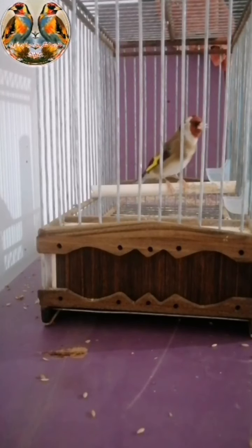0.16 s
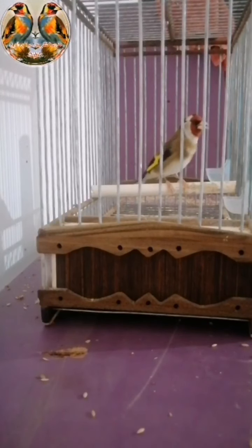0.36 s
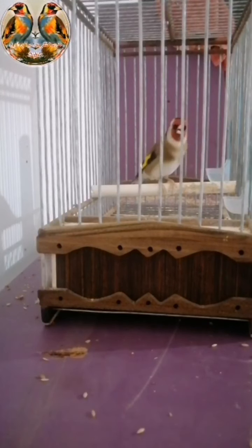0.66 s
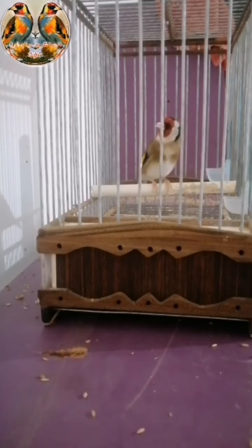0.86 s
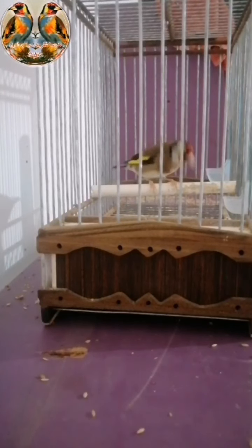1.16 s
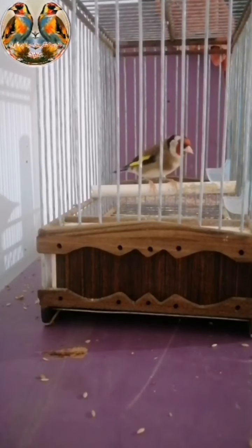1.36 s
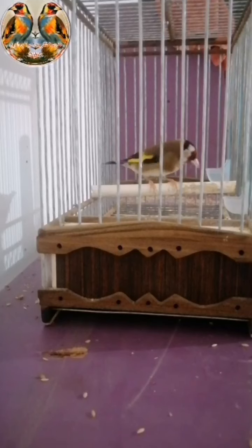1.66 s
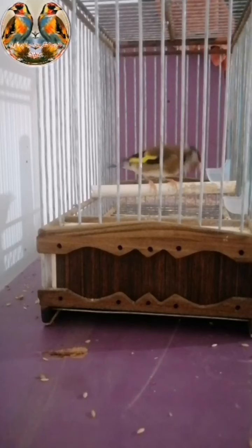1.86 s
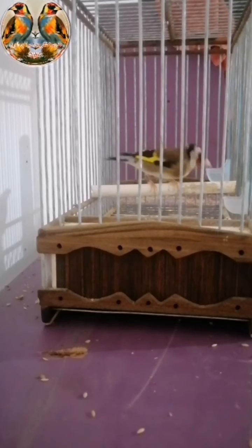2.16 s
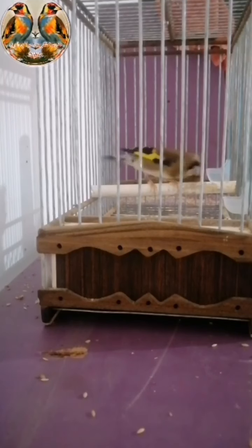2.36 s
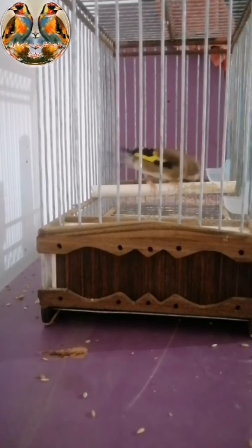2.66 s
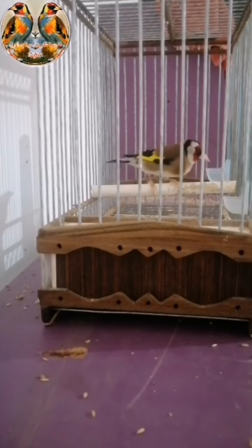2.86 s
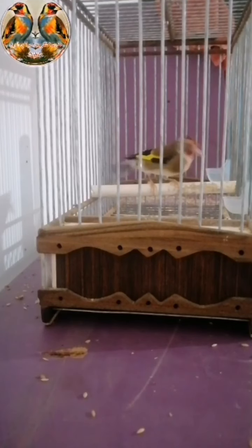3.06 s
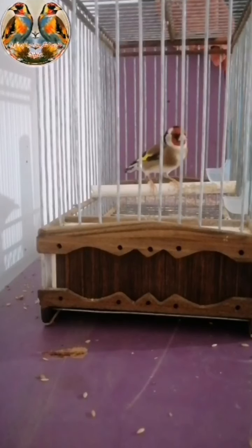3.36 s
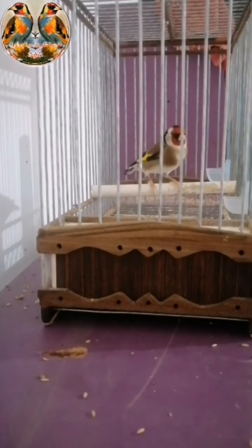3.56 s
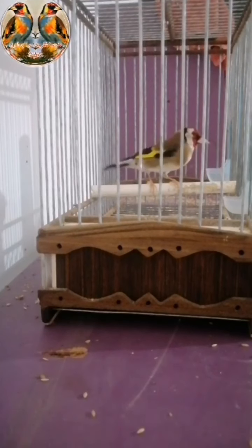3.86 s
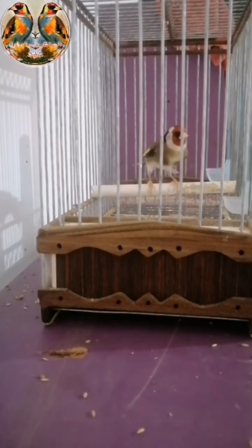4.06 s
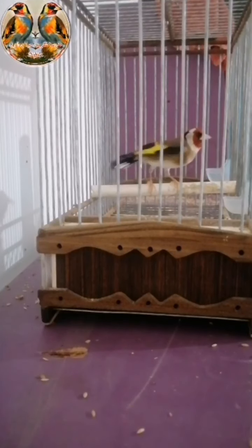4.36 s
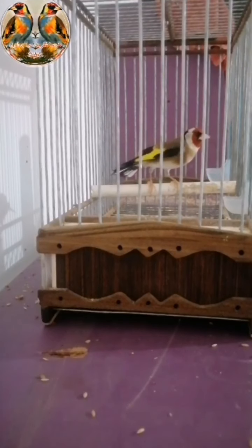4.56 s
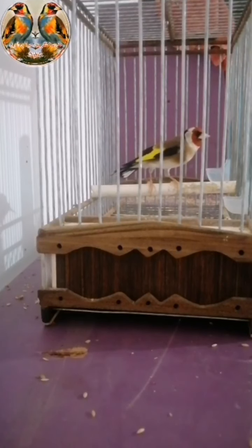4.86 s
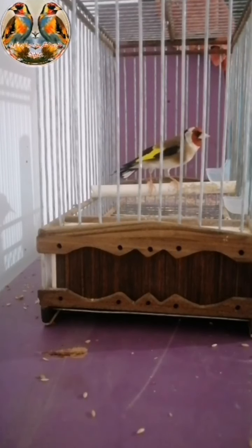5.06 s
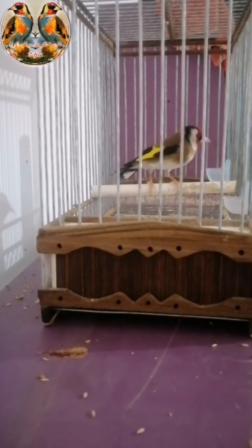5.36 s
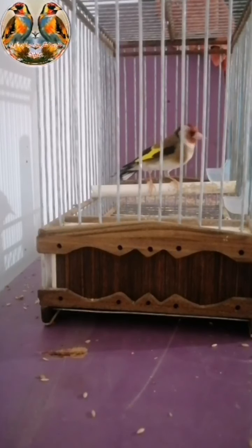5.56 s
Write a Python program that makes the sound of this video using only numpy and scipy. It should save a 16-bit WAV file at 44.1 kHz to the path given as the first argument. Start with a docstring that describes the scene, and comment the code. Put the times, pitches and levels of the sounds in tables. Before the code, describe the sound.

Rapid finch twittering, soft perch knocks and claw scrapes, then a few chirps indoors, with faint distant birds and low rumble.

```python
"""A caged finch is already in a fast phrase, close to the right-hand port of a phone in a small bare room,
over a bed of outside rumble, mains hum and microphone hiss. After a second it stops; the rumble swells
and other small birds whistle farther off. From 2 to 3 s it hops and knocks on its perch, and its claws
set the bars ringing. After 4 s come a few chirps, a long nasal note and a closing fall; the far birds
have the last word."""
import sys
import numpy as np
from scipy import signal
from scipy.fft import rfft, irfft
from scipy.io import wavfile

SR = 44100
rng = np.random.default_rng(int(sys.argv[2]) if len(sys.argv) > 2 else 0)


def digitize_waveform(pressure):
    """Quantize a signal to 16-bit integers and store it at the path in sys.argv[1].

    Rows of a 2-D input are taken as channels; values are limited to [-1, 1].
    """
    field = np.atleast_2d(pressure).T
    bounded = np.clip(field, -1, 1)
    quanta = np.round(bounded * 32767).astype(np.int16)
    wavfile.write(sys.argv[1], SR, quanta)


N = 252252

# ride of the outside rumble: t/s, level/dB
RUMBLE_RIDE = [(0, -64), (1.0, -64), (1.3, -53), (1.65, -56), (2.0, -59.5), (4.1, -60), (4.5, -60),
               (4.85, -62.5), (5.1, -57.5), (5.72, -61)]
# its tone: f/Hz, relative density/dB
RUMBLE_EQ = [(70, -25.5), (130, -2.5), (190, -0.5), (300, -2), (500, -2), (800, -7), (1350, -15),
             (2400, -13.5), (4000, -34), (6000, -70)]
# ride of the deep rumble in the building, which the hum follows: t/s, level/dB
DEEP_RIDE = [(0, -67.5), (1.0, -70.5), (1.2, -57.5), (2.0, -63), (4.0, -64), (4.8, -69), (5.1, -62),
             (5.72, -59.5)]
# its tone: f/Hz, relative density/dB
DEEP_EQ = [(18, -14.5), (45, -0.5), (75, -0.5), (130, -14), (200, -68)]
# stereo image of both rumbles: f/Hz, left-right correlation/0-1
RUMBLE_CORRELATION = [(60, 0.51), (290, 0.83), (640, 0.47), (1400, 0.019)]
# their lean to the right: f/Hz, left minus right/dB
RUMBLE_PAN = [(60, -1), (200, -2.5), (700, -9), (2400, -9.5)]
# tone of the microphone hiss: f/Hz, relative density/dB
HISS_EQ = [(2000, -77), (3500, 5.5), (5000, 8.5), (8000, 3.5), (15600, 5)]

# slaps off near surfaces: delay at the right port/s, level/dB
REFLECTIONS = [(.0021, -17), (.0047, -13.5), (.0083, -10), (0.0137, -25), (0.02, -14)]
# the room's initial decay: f/Hz, t60/s
ROOM_DECAY = [(200, 0.82), (2500, 0.91), (6600, 0.73), (12000, 0.35)]
# colour of the microphone ports: f/Hz, gain/dB
PORT_EQ = [(6500, -1.5), (7300, -2.5), (8700, -5.5), (10200, -13), (12000, 3.5), (14000, -13)]
# the phone's body shades the left port: f/Hz, gain/dB
LEFT_SHADE_EQ = [(2500, -4), (6000, 0), (8000, -10), (13000, -14)]

# cues for the far birds: t/s, length/s, start f/Hz, end f/Hz, level/dB
FAR_WHISTLES = [(1.271, 0.23, 3876, 3799, -56), (1.401, 0.19, 2522, 2561, -60.5),
                (3.301, 0.11, 2118, 2104, -71), (3.462, 0.14, 2403, 2240, -64),
                (4.375, 0.051, 3850, 3900, -45.5), (4.62, 0.111, 1712, 1900, -55.5),
                (5.031, 0.028, 4150, 4560, -67), (5.077, 0.15, 2396, 2460, -68),
                (5.12, 0.039, 3150, 3910, -56), (5.324, 0.1, 6030, 5950, -74),
                (5.384, 0.0516, 2830, 3285, -52), (5.429, 0.017, 3530, 4430, -54.5),
                (5.558, 0.029, 2644, 3180, -50.5), (5.585, 0.044, 3640, 4180, -64.5),
                (5.637, 0.077, 6690, 6550, -62.5)]
# feet and beak on perch and cage: t/s, relative thud level/dB, relative tick level/dB
KNOCK_CUES = [(2.075, -36.5, -55.5), (2.191, -45.5, -66), (2.234, -44, -53.5), (2.529, -33, -48),
              (2.601, -44.5, -65), (2.833, -47, -56.5)]
# a claw drags along a bar: t/s, length/s, ring f/Hz, ring gain/dB
SCRAPE_CUES = [(2.098, .05, 1410, -53), (2.17, .04, 1480, -46), (2.28, 0.038, 1580, -54),
               (2.585, 0.048, 1460, -56.5), (2.86, .07, 1170, -52)]
# resonances of the cage floor: f/Hz, gain/dB, t60/s
FLOOR_MODES = [(208.5, -9, 0.15), (280, 3.5, 0.14), (321.3, -2.5, 0.24), (439, -10.5, 0.21)]
# resonances of the bars: f/Hz, gain/dB, t60/s
BAR_MODES = [(1195, -10.5, 0.016), (1360, 11, 0.016), (1607, 10, 0.023), (2130, 16, 0.0065),
             (2620, 0, 0.014), (7630, 1.5, 0.005), (11900, -3, 0.002)]

# the notes of each syllable, one glide under one swell apiece: delay/s, length/s, start f/Hz, end f/Hz,
# haste, peak position/0-1, level/dB, swell/dB, fade/dB, second harmonic/dB, third harmonic/dB
SYLLABLES = { "hooked rise": [(-.004, 0.022, 2830, 3070, -0.8, 0.93, -5, 14, 13, -28.5, -31),
             (.016, 0.0067, 3228, 3160, 0.17, 0.6, 2.5, 10, 10, -28.5, -32),
             (.023, 0.012, 3260, 3970, -0.83, .8, -10.5, 2, 3, -25.5, -33),
             (.035, 0.024, 4025, 4406, 1.55, .4, -4, 6.5, 15.5, -23.5, -31.5)],
             "whip": [(-.005, .01, 3170, 4250, -.6, .9, -18, 5.5, 1.5, -29.5, -41),
             (.003, 0.023, 4157, 6750, 2.0, 0.32, 1, 13.5, 37.5, -21, -39)],
             "fall": [(-.002, .027, 7000, 6480, 3, 0.5, 0.5, 20, 9.5, -16.5, -52.5)],
             "double flick": [(0, .023, 3812, 5640, .3, 0.45, 0.5, 19, 14.5, -21.5, -53),
             (.024, .015, 4585, 5412, 0.27, .45, -4, 16, 10, -22.5, -40.5)],
             "dip": [(0, .013, 3723, 2964, .4, 0.7, -4, 13, 14, -31.5, -35),
             (.013, 0.014, 2917, 3612, 1.8, 0.03, 2, 9.5, 5.5, -31, -29),
             (.026, 0.014, 3534, 3646, .1, .35, 0, 8, 23, -31, -27.5)],
             "chirp": [(0, 0.013, 4570, 5690, 3, 0.77, 3.5, 16.5, 15.5, -17, -49),
             (0.0015, 0.029, 3170, 4090, -1.5, 0.54, 6.5, 29, 5.5, -33, -24),
             (.005, 0.021, 2350, 2700, -5, 0.16, -8, -5, 0, -12, -28),
             (.003, .012, 8300, 9000, 1.5, .6, -11, 8, 8, -40, -60),
             (0.038, 0.016, 4820, 5060, -5, 0.5, 1, 12, 11, -17, -38)],
             "call": [(-.004, .04, 3085, 4054, 0.76, 0.53, -1.5, 21, 1.5, -16, -20),
             (-.002, 0.0234, 2334, 2560, 1.36, 0.92, -6, 18, -14, -10.5, -19)],
             "hold": [(-.003, 0.053, 2900, 2975, 2.44, 0.32, -1, 14, -1, -30, -34)],
             "sweep": [(0.004, .026, 2950, 4330, 0.44, 0.32, -2.5, 7.5, 13, -39, -39)],
             "closing fall": [(0.001, 0.042, 3680, 2817, 0.92, 0.8, 0, 5, 15.5, -37, -47)], }
# a faint high hiss riding on each note, by syllable: level against the tone/dB
SYLLABLE_HISS = {"hooked rise": -31, "whip": -17, "fall": -33, "double flick": -20, "dip": -31, "chirp":
                 -21, "call": -25, "hold": -34, "sweep": -42, "closing fall": -48}
# the finch's cues: t/s, syllable, pitch ratio, level/dB, left against right/dB
SONG = [(-.134, "hooked rise", 0.93, -18.5, -8), (-.048, "whip", 0.99, -12.5, -4.5),
        (0.017, "hooked rise", 1.002, -16.5, -6.5), (.101, "whip", 0.98, -15, -8.5),
        (.163, "hooked rise", 0.99, -16.5, -4.5), (.254, "whip", 0.96, -16.5, -11),
        (.314, "hooked rise", 0.99, -16.5, -7.5), (0.403, "whip", 0.99, -16.5, -7),
        (.474, "hooked rise", 1.002, -16, -10), (.591, "fall", 1.034, -21.5, -9),
        (.633, "double flick", 1.016, -23.5, -7), (.703, "dip", 0.98, -19, -7),
        (0.752, "fall", 0.99, -21, -10), (.797, "double flick", 0.99, -16.5, -8.5),
        (.868, "dip", 1.0, -20.5, -4.5), (.918, "fall", 0.97, -19, -22.5),
        (0.962, "double flick", 0.99, -20.5, -10), (4.143, "chirp", 0.97, -29.5, -13),
        (4.426, "call", 0.97, -28, -14), (4.464, "hold", 0.99, -24.5, -16),
        (4.514, "sweep", 1.03, -21.5, -12.5), (4.747, "closing fall", 1.002, -26.5, -16)]
# harmonics 1 to 8 as the nasal note opens: relative level/dB
NASAL_TIMBRE = [-44, -20.5, -5, -28, -29.5, -16, -41, -31]
# their shift by its end, as the beak closes: gain/dB
NASAL_MORPH = [-6, 6.5, -6.5, 2, -4, -13, -10, -8]

HUM_HZ, HISS_DB = 99.7, -74
SONG_SEND_DB, CAGE_SEND_DB, ROOM_LEFT_DB = -7.5, -17.5, -11.5
FAR_DIRECT_DB, FAR_LEFT_DB = -9, -18
BOUNCE_S, BOUNCE_DB = 0.01806, -2.5   # the foot lands a second time
SCRAPE_T60_S = 0.054
FLUTTER_DB, FLUTTER_HZ = 3.5, 90
NASAL_START_S, NASAL_LENGTH_S, NASAL_DB, NASAL_LEFT_DB = 4.566, 0.204, -21, -18
NASAL_ATTACK_S, NASAL_RELEASE_S, NASAL_SAG_HZ = 0.011, 0.04, 36
LEFT_LEAD_S, CUTOFF_HZ = 0.00027, 15980
PREROLL = SR // 4   # samples: the song is under way before time 0, so the room already rings


def amp(db):
    """Decibels to gain."""
    return 10 ** (np.asarray(db) / 20)


def rms_one(x):
    """Scale to unit power."""
    return x / np.sqrt(np.mean(x ** 2) + 1e-20)


def ride(points):
    """A fader curve (t/s, level/dB) at every sample."""
    return np.interp(np.arange(N) / SR, *np.transpose(points))


def at_hz(points, hz):
    """A curve (f/Hz, value) read on a log-frequency axis."""
    freqs, values = np.transpose(points)
    return np.interp(np.log(hz), np.log(freqs), values)


def drift(rate_hz, size):
    """Random wobble: smoothed noise of unit power."""
    pole, run_in = np.exp(-2 * np.pi * rate_hz / SR), int(SR / rate_hz)
    smooth = signal.lfilter([1], [1, -2 * pole, pole * pole], rng.standard_normal(size + run_in))
    return rms_one(smooth[run_in:])


def filtered(x, order, hz, kind):
    """A low, high or band pass with a flat passband."""
    return signal.sosfilt(signal.butter(order, hz, kind, fs=SR, output="sos"), x)


def noise_bed(eq, correlation, flicker_db):
    """Stereo noise of unit power in half-octave bands, each with its own level, flicker and width."""
    out, edges = 0, 18 * 2 ** np.arange(0, 10.3, .5)
    white = rng.standard_normal((2, 2, N))
    for k, (low, high) in enumerate(zip(edges, edges[1:])):
        hz = np.sqrt(low * high)
        if at_hz(eq, hz) > -60:
            mid, side = filtered(white[k % 2], 2, [low, high], "band")
            alike = at_hz(correlation, hz)
            gain = amp(at_hz(eq, hz) + flicker_db * drift(6, N))
            out = out + gain * (np.sqrt(1 + alike) * mid + np.sqrt(1 - alike) * side * [[1], [-1]])
    return rms_one(out)


def microphone_hiss():
    """Each port adds its own steady hiss."""
    return amp(HISS_DB) * noise_bed(HISS_EQ, correlation=[(1000, 0), (2000, 0)], flicker_db=0.3)


def mains_hum():
    """A wavering low tone that rises and sinks with the deep rumble."""
    phase = 2 * np.pi * np.cumsum(HUM_HZ + 4 * drift(8.8, N)) / SR
    level_db = ride(DEEP_RIDE) + 3 + 2.6 * drift(3.5, N)
    return amp(level_db) * np.sin(phase) * amp([[-1], [1]])


def rumble():
    """Rumble from outside over the building's deep one, leaning further right towards the treble."""
    outside = amp(ride(RUMBLE_RIDE) - 0.5) * noise_bed(RUMBLE_EQ, RUMBLE_CORRELATION, flicker_db=2.5)
    outside = filtered(outside, 8, 3100, "low")   # walls stop the treble
    deep = amp(ride(DEEP_RIDE)) * noise_bed(DEEP_EQ, RUMBLE_CORRELATION, flicker_db=0.4)
    hz = np.fft.rfftfreq(N, 1 / SR) + 1
    pan = amp(at_hz(RUMBLE_PAN, hz) * [[.5], [-.5]])
    return irfft(rfft(outside + deep) * pan, N)


def room_tail(send, bend_db):
    """Diffuse reverb, separate at each port, dying band by band; bend_db (dB/s^2) steepens the fade."""
    t = np.arange(SR * 3 // 4) / SR
    tail, edges = 0, 100 * 2 ** np.arange(0, 7.6, .5)
    for low, high in zip(edges, edges[1:]):
        band = filtered(rng.standard_normal((2, len(t))), 2, [low, high], "band")
        t60 = at_hz(ROOM_DECAY, np.sqrt(low * high))
        tail = tail + band * amp(-60 * t / t60 - bend_db * t ** 2)
    tail *= 1 - np.exp(-t / 0.003)   # blooms in a few ms
    tail *= amp([[ROOM_LEFT_DB], [0]]) / np.sqrt(np.sum(tail ** 2, axis=1, keepdims=True))
    return signal.fftconvolve(send[None], tail, axes=1)[:, :len(send)]


def near_echoes(x):
    """The direct sound plus early reflections, sooner and softer at the left port."""
    out = x.copy()
    for delay_s, level_db in REFLECTIONS:
        for side, (stretch, side_db) in enumerate([(0.79, ROOM_LEFT_DB), (1, 0)]):
            lag = round(delay_s * stretch * SR)
            out[side, lag:] += amp(level_db + side_db) * x[1, :-lag]
    return out


def add_note(track, start, hz, level_db, harmonics_db, left_db, edge_s, hiss_db=-40, rasp=0.67):
    """Lay in one bird note: harmonics of a glide, all but the strongest raspy, plus a faint high hiss."""
    phase = 2 * np.pi * (np.cumsum(hz) / SR + rng.random())
    roughness = 1 + rasp * drift(500, len(hz))
    strongest = 1 + np.argmax([np.mean(db) for db in harmonics_db])
    tone = 0
    for k, db in enumerate(harmonics_db, 1):
        harmonic = amp(db) * np.sin(k * phase) * (k * hz < SR / 2.2)
        tone = tone + harmonic * (1 if k == strongest else roughness)
    hiss = amp(hiss_db) * rms_one(np.diff(rng.standard_normal(len(hz) + 2), 2))
    steps = np.arange(len(hz))
    ramps = np.clip(np.minimum(steps, steps[::-1]) / (edge_s * SR), 0, 1)
    note = (tone + hiss) * np.sin(np.pi / 2 * ramps) ** 2 * amp(level_db)
    at = PREROLL + round(start * SR)
    slot = track[:, at:at + len(hz)]
    slot += note[:slot.shape[1]] * amp([[left_db], [0]])


def far_birds():
    """Thin whistles that waver in pitch and level."""
    track = np.zeros((2, N + PREROLL))
    for start, length, from_hz, to_hz, level_db in FAR_WHISTLES:
        size = round(length * SR)
        hz = np.linspace(from_hz, to_hz, size) * (1 + 0.0041 * drift(51, size))
        waver_db = 2.5 * drift(30, size)
        waver_db -= waver_db.mean()
        add_note(track, start, hz, level_db + waver_db, [0], FAR_LEFT_DB, edge_s=0.0092, hiss_db=-59)
    return track


def ring(clicks, modes):
    """Clicks set damped resonances (f/Hz, gain/dB, t60/s) ringing."""
    out = 0
    for hz, gain_db, t60 in modes:
        decay, angle = amp(-60 / (t60 * SR)), 2 * np.pi * hz / SR
        feedback = [1, -2 * decay * np.cos(angle), decay * decay]
        out = out + signal.lfilter([0, amp(gain_db) * np.sin(angle)], feedback, clicks + 1e-18)
    return out


def claw_scrapes():
    """A claw drags along a bar, and its tiny slips make the bar ring."""
    bars = 0
    for start, length, hz, gain_db in SCRAPE_CUES:
        at, size = PREROLL + round(start * SR), round(length * SR)
        slips = np.zeros(N + PREROLL)
        slips[at:at + size] = np.hanning(size) * rng.standard_normal(size) / 10
        bars = bars + ring(slips, [(hz, gain_db, SCRAPE_T60_S)])
    return bars


def cage_knocks():
    """Each knock ticks on the bars, then thuds in the cage floor, amid scuffling and scraping claws."""
    thud, tick = np.zeros((2, N + PREROLL))
    t = np.arange(round(.1 * SR)) / SR
    push = np.exp(-((t - .009) / 0.00089) ** 2)   # the foot's weight lands softly
    push += amp(BOUNCE_DB) * np.roll(push, round(BOUNCE_S * SR))
    tick_envelope = np.exp(-t / 0.005) + 0.4 * (1 - t / t[-1])
    for start, thud_db, tick_db in KNOCK_CUES:
        at = PREROLL + round(start * SR)
        scuffle = rng.standard_normal((2, len(t))) * (rng.random((2, len(t))) < 6000 / SR)
        thud[at:at + len(t)] += amp(thud_db - 32) * push + amp(thud_db - 31.5) * scuffle[0]
        tick[at:at + len(t)] += amp(tick_db - 13) * scuffle[1] * tick_envelope
    floor = filtered(ring(thud, FLOOR_MODES), 4, 170, "high")   # too small for bass
    bars = ring(tick, BAR_MODES) + claw_scrapes()
    return floor * amp([[-9], [0]]) + bars * amp([[-14], [0]])


def glide(length, from_hz, to_hz, haste):
    """A note's progress (0-1) and pitch; haste above 0 bends early, below 0 bends late."""
    progress = np.arange(round(length * SR)) / (length * SR)
    bend = np.expm1(-haste * progress) / np.expm1(-haste - 1e-9)
    return progress, from_hz + (to_hz - from_hz) * bend


def swell(progress, peak, swell_db, fade_db):
    """Envelope in dB: a rounded rise to the peak and a rounded fall after it."""
    peak = np.clip(peak, .05, .95)
    rise = -swell_db * (1 - progress / peak) ** 2
    fall = -fade_db * ((progress - peak) / (1 - peak)) ** 2
    return np.where(progress < peak, rise, fall)


def finch_syllables():
    """The finch strings glides into syllables; each note's level flutters quickly and unevenly."""
    track = np.zeros((2, N + PREROLL))
    for start, name, ratio, cue_db, left_db in SONG:
        for note in SYLLABLES[name]:
            delay, length, from_hz, to_hz, haste, peak, note_db, swell_db, fade_db, *upper_db = note
            progress, hz = glide(length, from_hz, to_hz, haste)
            flutter_db = FLUTTER_DB * drift(FLUTTER_HZ, len(hz))
            flutter_db -= flutter_db.mean()
            level_db = cue_db + note_db + swell(progress, peak, swell_db, fade_db) + flutter_db
            add_note(track, start + delay, ratio * hz, level_db, [0, *upper_db], left_db,
                     edge_s=0.002, hiss_db=SYLLABLE_HISS[name])
    return track


def finch_nasal_note():
    """A long note that drops, then slowly sags; the throat favours its third harmonic."""
    track = np.zeros((2, N + PREROLL))
    progress, hz = glide(NASAL_LENGTH_S, from_hz=2075, to_hz=1872, haste=15)
    hz -= NASAL_SAG_HZ * progress
    t = progress * NASAL_LENGTH_S
    attack_db = -25 * np.clip(1 - t / NASAL_ATTACK_S, 0, 1)
    release_db = -25 * np.clip(1 - t[::-1] / NASAL_RELEASE_S, 0, 1)
    level_db = NASAL_DB + attack_db + release_db + FLUTTER_DB * drift(28.7, len(t))
    harmonics_db = np.c_[NASAL_TIMBRE] + np.c_[NASAL_MORPH] * progress
    add_note(track, NASAL_START_S, hz, level_db, harmonics_db, NASAL_LEFT_DB, edge_s=0.0038, rasp=0.12)
    return track


def scene():
    """The mix: finch and cage up close, far birds mostly reverb, all coloured by the ports, over the bed."""
    song = finch_syllables() + finch_nasal_note()
    cage, far = cage_knocks(), far_birds()
    direct = near_echoes(song + cage) + amp(FAR_DIRECT_DB) * far
    direct[0] = np.roll(direct[0], -round(LEFT_LEAD_S * SR))
    send = amp(SONG_SEND_DB) * song[1] + amp(CAGE_SEND_DB) * cage[1]
    mix = direct + room_tail(send, bend_db=170) + room_tail(far[1], bend_db=550)
    hz = np.fft.rfftfreq(N + PREROLL, 1 / SR) + 1
    colour = amp(at_hz(PORT_EQ, hz) + at_hz(LEFT_SHADE_EQ, hz) * [[1], [0]])
    coloured = irfft(rfft(mix) * colour, N + PREROLL)[:, PREROLL:]
    return coloured + rumble() + mains_hum() + microphone_hiss()


def record(dry):
    """A steep high cut, 70 dB down from the cutoff up."""
    return signal.sosfilt(signal.cheby2(14, 70, CUTOFF_HZ, fs=SR, output="sos"), dry)


dry = scene()
out = record(dry)
digitize_waveform(out)
```